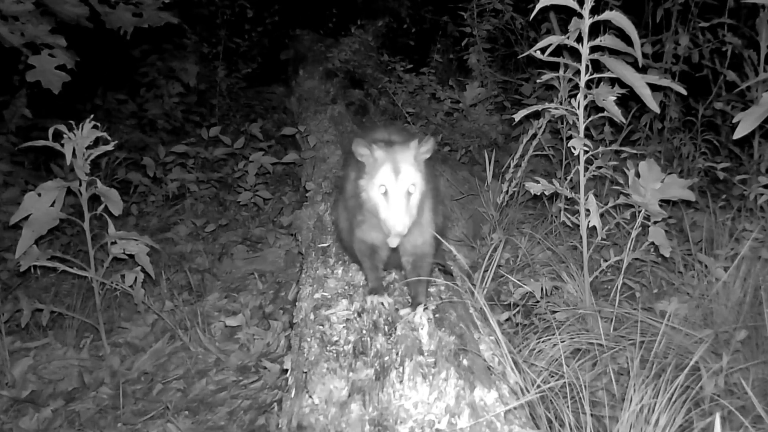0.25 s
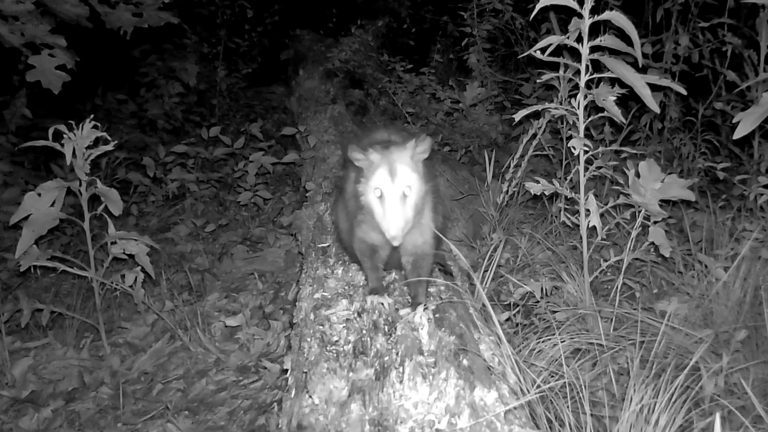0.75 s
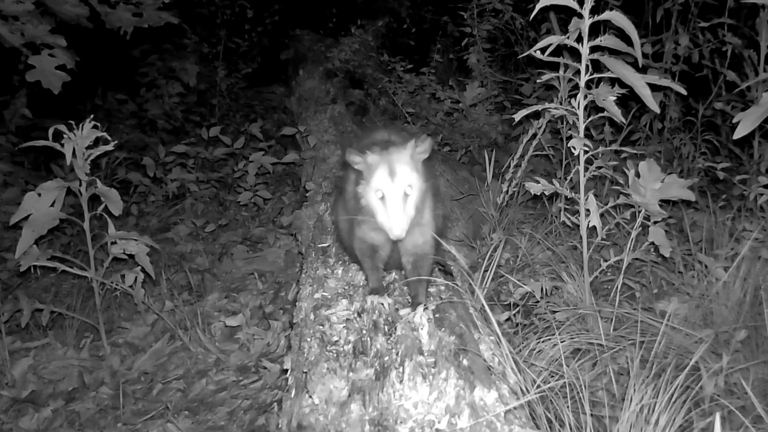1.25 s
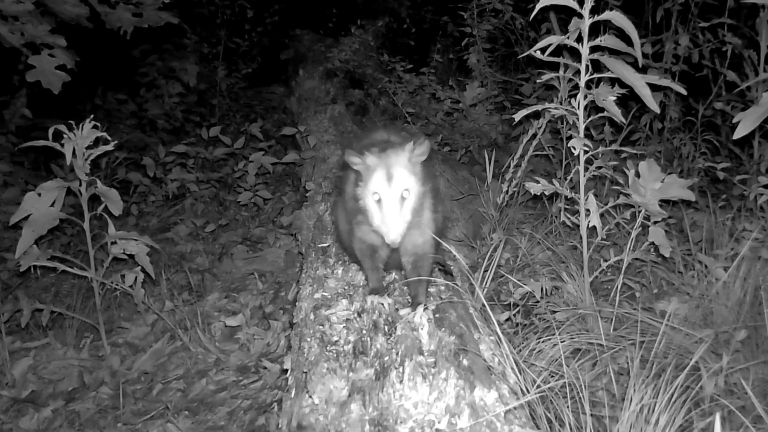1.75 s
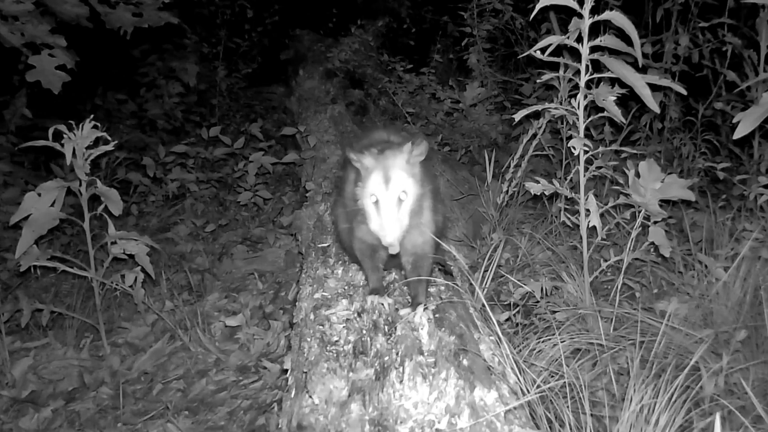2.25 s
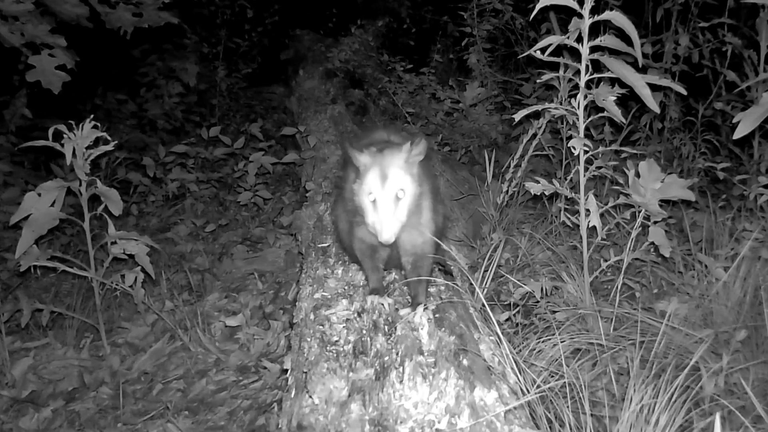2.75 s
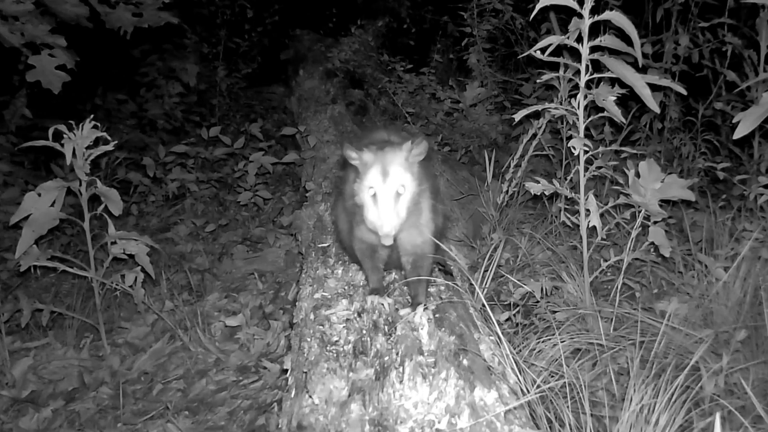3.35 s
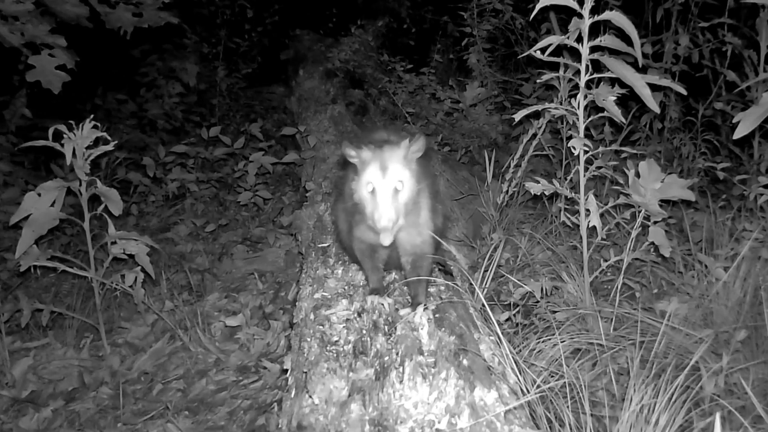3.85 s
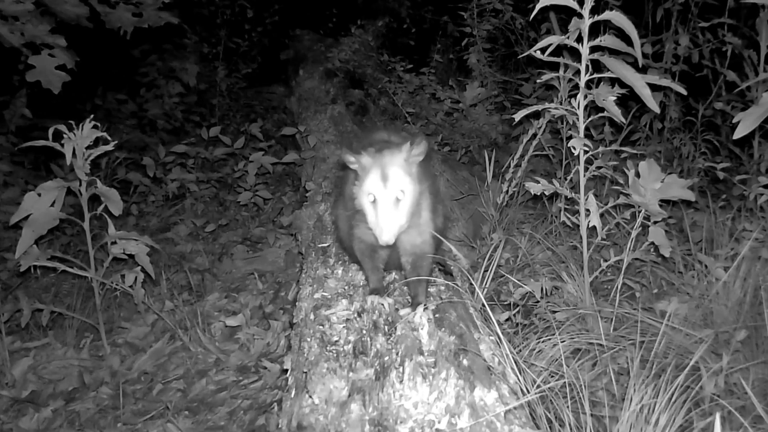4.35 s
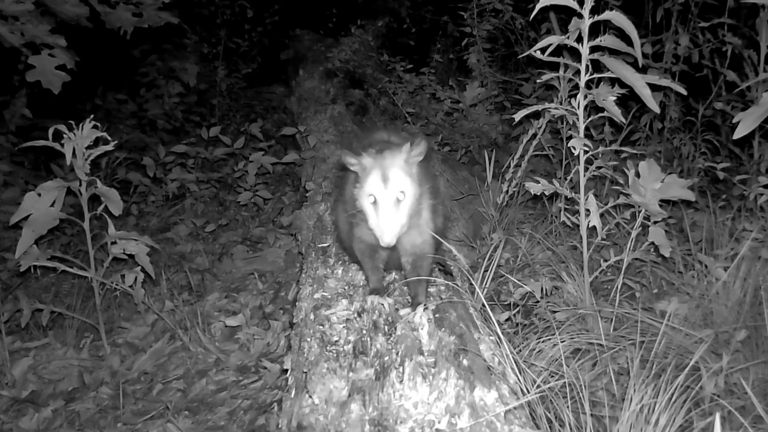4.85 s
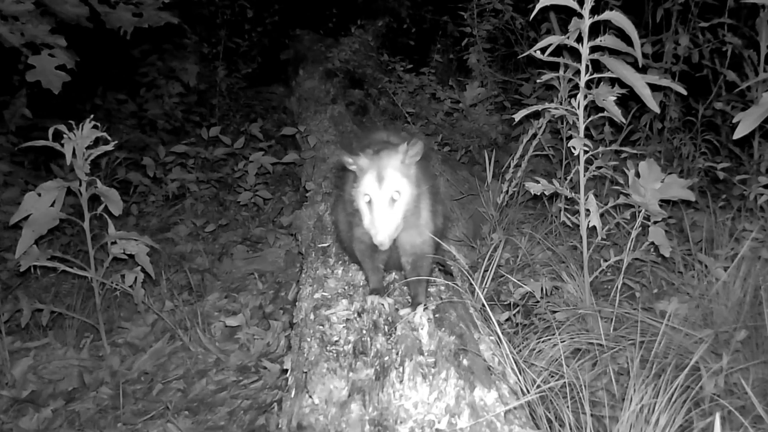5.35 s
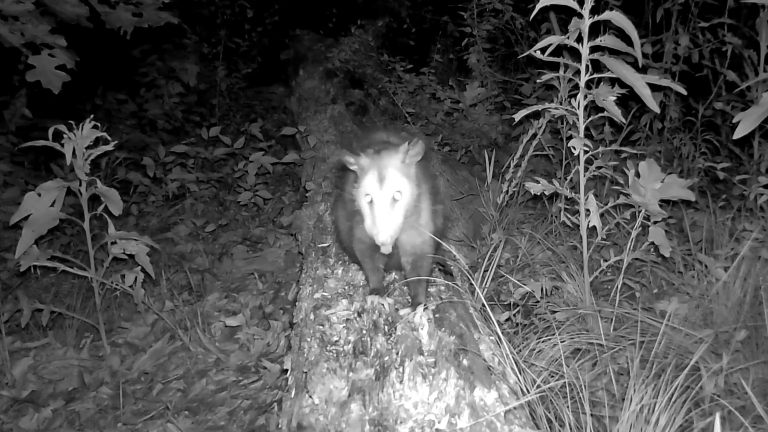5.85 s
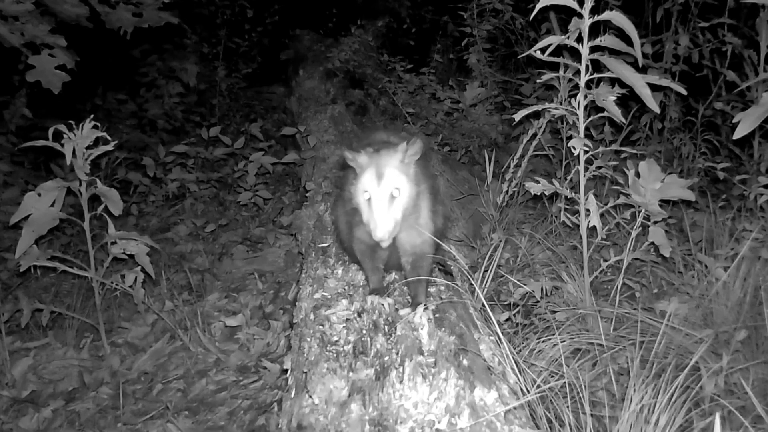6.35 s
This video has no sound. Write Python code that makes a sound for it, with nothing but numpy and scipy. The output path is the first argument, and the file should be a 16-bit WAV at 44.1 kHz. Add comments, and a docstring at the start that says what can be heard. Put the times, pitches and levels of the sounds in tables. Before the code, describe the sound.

A night scene at the edge of a wood, about six and a half seconds, heard by a small fixed outdoor microphone with dulled treble. Throughout, far motors drone low and slowly beat beneath soft air, a shimmering insect chorus, distant crickets and fine leaf ticks. Two near crickets chirp constantly, one about three swelling chirps a second, the other about four quick double strokes. From 0.1 s an opossum smacks its jaws wetly and crunches food; the firmest smacks come before 1 s, with crisp bites roughly every 0.4 s afterwards. At 2.2 s a soft low rush darkens and dies away, and brief low hum swells come and go until 5.6 s. At 4.0 s a tree frog gives one blurred trill of about half a second; at 4.2 s a hard morsel snaps brightly. Lighter smacks continue to about 6.2 s, with a last small crunch near 6.55 s.

```python
"""Night at the edge of a wood, heard by a trail camera. Throughout: far motors as steady sines that beat,
noise-band air and insect chorus, far crickets and leaf ticks. From the start an opossum smacks its jaws
(damped modes) and crunches its food (impulse clusters), and two near crickets chirp (swept wing strokes).
A low rush of noise dies away from 2.2 s; brief swells of low hum (sines, 58 to 120 Hz) come between 2.2 and
5.6 s; a tree frog trills once at 4 s (pulsed throat modes), and one hard morsel snaps at 4.2 s."""
import sys
import numpy as np
from scipy import signal
from scipy.fft import rfft, irfft
from scipy.io import wavfile
from scipy.ndimage import uniform_filter1d

SR = 44100
rng = np.random.default_rng(int(sys.argv[2]) if len(sys.argv) > 2 else 0)


def output_pcm(signal):
    """Save a mono or channel-first signal as 16-bit PCM at the path in sys.argv[1].

    Samples are clipped to [-1, 1] before scaling.
    """
    pcm = np.clip(np.atleast_2d(signal).T, -1, 1) * 32767
    wavfile.write(sys.argv[1], SR, np.round(pcm).astype(np.int16))


N = 290619
TIME = np.arange(N) / SR

# bites into the food: middle t/s, half length/s, crisp cracks level/dB, crack f/Hz, soft munch level/dB
BITE_TABLE = [(0.143, .0017, -35, 5140, -62), (0.19, .006, -52, 5950, -61),
              (0.611, 0.0082, -45.5, 7560, -45.5), (0.982, .008, -50.5, 6300, -56),
              (1.351, 0.0057, -51, 7700, -55), (1.823, 0.0055, -39.5, 7350, -64),
              (2.217, 0.01, -46.5, 6820, -56.5), (2.608, .01, -46, 7250, -53.5),
              (2.986, 0.0022, -47, 5060, -71), (3.365, .0023, -46, 6800, -66),
              (3.765, 0.011, -63.5, 7000, -56), (4.167, 0.01, -44.5, 6760, -65),
              (4.428, 0.006, -41.5, 3150, -63), (4.569, 0.0054, -48.5, 5500, -62),
              (4.908, 0.0086, -61, 6800, -52.5), (5.102, 0.024, -56, 7550, -53),
              (6.552, 0.0031, -53.5, 7100, -68)]


def undb(db):
    """Decibels to gain."""
    return 10 ** (np.asarray(db) / 20)


def level(x, db):
    """Scale to an rms level."""
    return x * undb(db) / np.sqrt(np.mean(x ** 2))


def add(out, start_s, x):
    """Mix a short sound in at start_s, cut at the end of out."""
    i = max(int(start_s * SR), 0)
    part = x[:max(N - i, 0)]
    out[i:i + len(part)] += part


def span(seconds):
    """Time axis of a short sound."""
    return np.arange(int(seconds * SR)) / SR


def walk(rate_hz):
    """Random values held 1 / rate_hz, smoothed twice, scaled to rms 1."""
    hold = int(SR / rate_hz)
    held = np.repeat(rng.standard_normal(N // hold + 1), hold)
    smooth = uniform_filter1d(uniform_filter1d(held, hold), hold)
    return level(smooth[:N], 0)


def noise(points):
    """Gaussian noise shaped by (Hz, dB) points, interpolated over log frequency."""
    hz, db = np.transpose(points)
    f = np.maximum(np.fft.rfftfreq(N, 1 / SR), 1)
    gain = undb(np.interp(np.log(f), np.log(hz), db))
    return irfft(rfft(rng.standard_normal(N)) * gain, N)


def resonate(x, hz, width_hz):
    """One resonance, gain 1 at its centre."""
    b, a = signal.iirpeak(hz, hz / width_hz, fs=SR)
    return signal.lfilter(b, a, x)


def ring(t, hz, t60_s, rise_s):
    """A damped mode with a quick swell, envelope peak 1."""
    envelope = (1 - np.exp(-t / rise_s)) * np.exp(-np.log(1000) * t / t60_s)
    return envelope / envelope.max() * np.sin(2 * np.pi * hz * t)


def scatter(x, t60_s, wet_db):
    """Diffuse echo: a decaying noise tail of unit energy, set by wet_db."""
    t = span(1)
    envelope = np.exp(-np.log(1000) * t / t60_s) * (1 - np.exp(-t / 0.0044))
    tail = rng.standard_normal(len(t)) * envelope
    tail /= np.sqrt(np.sum(tail ** 2))
    return undb(wet_db) * signal.fftconvolve(x, tail)[:N]


def motors(slow_shaft_hz=56.24, fast_shaft_hz=59.26, in_step_s=5.559):
    """Multiples of two far shaft speeds and lone tones, all in step at in_step_s; close ones beat."""
    # shaft multiples 1, 2, 3 ..: level/dB rms
    slow_shaft_db = [-68, -57, -58, -54, -72, -66, -70.5]
    fast_shaft_db = [-59, -54, -80, -67.5]
    # lone steady tones: f/Hz; level/dB rms
    lone_hz = [109.76, 120.01, 210.9, 240.02, 535.5]
    lone_db = [-70, -55.5, -72.5, -76, -71.5]
    tones = list(zip(lone_hz, lone_db))
    for shaft_hz, dbs in (slow_shaft_hz, slow_shaft_db), (fast_shaft_hz, fast_shaft_db):
        tones += [(shaft_hz * (k + 1), db) for k, db in enumerate(dbs)]
    from_step = TIME - in_step_s
    return sum(np.sqrt(2) * undb(db) * np.cos(2 * np.pi * hz * from_step) for hz, db in tones)


def background(air_db=-52.0, chorus_db=-55.5):
    """Low night air and a shimmering far insect chorus, both shaped noise."""
    # air spectrum: f/Hz, relative level/dB per Hz
    air_points = [(20, -12), (38, 2.5), (60, -0.5), (85, 0), (115, 1), (150, -5.5), (215, -1), (260, -8.5),
                  (400, -11.5), (700, -16), (1300, -17), (2000, -21.5), (3300, -24.5), (9000, -42.5)]
    # insect chorus spectrum: f/Hz, relative level/dB per Hz
    chorus_points = [(3000, -30.5), (3450, -16), (3750, -9.5), (4120, 2), (4500, -4.5), (4900, -2),
                     (5100, -15.5), (6000, -23), (6800, -19), (7600, -24), (9000, -28.5)]
    air = level(noise(air_points) * undb(0.47 * walk(2.6)), air_db)
    shimmer_db = 1.3 * walk(60) + 1.0 * walk(5.3)
    return air + level(noise(chorus_points) * undb(shimmer_db), chorus_db)


def wing_stroke(t, length_s=0.01947, start_hz=4200, drop_hz=600, lateness=2.09):
    """The scraper gathers force along the file, then slows: the tone swells late and sinks in pitch."""
    u = np.clip(t / length_s, 0, 1)
    # integral of start_hz - drop_hz * u ** 3
    cycles = length_s * (start_hz * u - drop_hz * u ** 4 / 4)
    force = np.abs(np.sin(np.pi * u ** lateness))
    return force * np.sin(2 * np.pi * cycles)


def far_crickets(strokes_per_s=26, db=-59):
    """Crickets deeper in the wood: random wing strokes smeared by the trees."""
    out, t = np.zeros(N), span(.03)
    for when, pitch, size in rng.random((int(strokes_per_s * N / SR), 3)):
        add(out, when * N / SR, size * wing_stroke(t * (1 + .035 * pitch)))
    return level(out + scatter(out, t60_s=0.13, wet_db=-6.5), db)


def leaf_ticks(db=-70, centre_hz=6100, spread=0.23, ticks_per_s=130):
    """Fine dense crackle in the leaf litter: short modes of random pitch, most of them small."""
    out, t = np.zeros(N), span(.02)
    for when, pitch, size in rng.random((int(ticks_per_s * N / SR), 3)):
        hz = centre_hz * (1 + spread * (2 * pitch - 1))
        tick = ring(t, hz, t60_s=.002, rise_s=.0003) / (.02 + size) ** .45
        add(out, when * N / SR, tick)
    return level(out + scatter(out, t60_s=.015, wet_db=2), db)


def chewing():
    """The opossum's jaws, echoed by the log and the plants around it."""
    out = smacks() + crunches() + snap() + crumbs()
    log_echo = scatter(out, t60_s=0.03, wet_db=-13)
    plant_echo = scatter(out, t60_s=0.14, wet_db=-15.5)
    return out + log_echo + plant_echo


def crumbs(max_db=-44, range_db=9, centre_hz=6700, spread=0.19, count=14):
    """Stray crumbs crack at random times, each a short high mode."""
    out, t = np.zeros(N), span(.02)
    for when, pitch, size in rng.random((count, 3)):
        hz = centre_hz * (1 + spread * (2 * pitch - 1))
        crack = ring(t, hz, t60_s=0.0095, rise_s=0.00064)
        add(out, when * N / SR, undb(max_db - range_db * size) * crack)
    return out


def smacks(body_db=-4, crackle_db=-10.5, usual_db=-40, usual_t60_s=0.023, halving_db=14):
    """Tooth tick, mouth ring and wet crackle; a firmer smack shuts the mouth sooner, so rings shorter."""
    # jaw smacks: t/s, mouth ring level/dB, mouth f/Hz, tooth tick level/dB, tick f/Hz
    smack_table = [(0.1422, -19.5, 1590, -28.5, 3000), (.1622, -36, 1420, -48, 3020),
                   (0.1885, -27.5, 1110, -25.5, 2450), (0.2006, -38, 950, -47, 2600),
                   (0.617, -27.5, 1276, -22.5, 3840), (0.6628, -27, 1040, -14, 3080),
                   (.826, -39, 1070, -61, 2500), (0.9784, -30.5, 1555, -24, 3600),
                   (1.259, -43, 930, -61, 2500), (1.823, -52, 1616, -31.5, 5040),
                   (1.96, -54, 1500, -33.5, 3460), (2.226, -41.5, 1390, -45, 3150),
                   (2.6074, -35.5, 1650, -55, 3520), (2.782, -38.5, 1265, -60, 2800),
                   (3.132, -42.5, 1283, -48, 2840), (3.492, -49.5, 3080, -43, 3080),
                   (4.428, -41.5, 1570, -44, 3340), (4.558, -47.5, 2250, -38, 2530),
                   (4.906, -38.5, 2140, -34.5, 3200), (4.9617, -38, 1490, -58, 3050),
                   (5.085, -45, 1700, -47, 2580), (5.125, -40, 1315, -49, 3000),
                   (5.396, -47.5, 1580, -57, 3000), (5.549, -46, 1220, -60, 3000),
                   (5.947, -43, 1280, -52, 2600), (6.161, -44, 3080, -41, 2300)]
    out, t = np.zeros(N), span(.06)
    for start_s, mouth_db, mouth_hz, tick_db, tick_hz in smack_table:
        t60_s = usual_t60_s * 2 ** ((usual_db - mouth_db) / halving_db)
        mouth = ring(t, mouth_hz, t60_s, rise_s=0.00036)
        mouth += undb(body_db) * ring(t, 2.02 * mouth_hz, t60_s=0.0017, rise_s=0.000086)
        drops = rng.standard_normal(len(t)) * (rng.random(len(t)) < .03) * np.exp(-t / 0.013)
        crackle = resonate(drops, 0.72 * mouth_hz, width_hz=1300)
        crackle *= undb(crackle_db) / np.abs(crackle).max()
        tick = ring(t, tick_hz, t60_s=0.003, rise_s=0.00022)
        add(out, start_s, undb(mouth_db) * (mouth + crackle) + undb(tick_db) * tick)
    return out


def crunches():
    """At each bite the food crumbles: a cluster of tiny cracks, crisp with a hollow undertone."""
    out, t = np.zeros(N), span(.1) - .1 / 2
    for middle_s, half_s, db, hz, _ in BITE_TABLE:
        cracks = rng.standard_normal(len(t)) * (rng.random(len(t)) < .08)
        window = np.exp(-np.abs(t) / half_s)
        crisp = resonate(resonate(cracks, hz, width_hz=940), hz, width_hz=1200)
        hollow = undb(-13.5) * resonate(cracks, hz=1660, width_hz=1300)
        cluster = level((crisp + hollow) * window, db)
        # restore the energy share of the window: longer bites carry more
        add(out, middle_s + t[0], cluster * np.sqrt(np.mean(window ** 2)))
    return out


def munching(grains_per_s=900, stretch=1.5):
    """At each bite soft food gives way in a scatter of dull grains, longer than the cracks by stretch."""
    drops = (rng.random(N) < grains_per_s / SR) * rng.standard_normal(N)
    mouth = resonate(drops, hz=1550, width_hz=700)
    mouth += undb(-6.5) * resonate(drops, hz=2700, width_hz=4700)
    pressure = np.zeros(N)
    for middle_s, half_s, _, _, db in BITE_TABLE:
        pressure += undb(db) * np.exp(-((TIME - middle_s) / (stretch * half_s)) ** 2)
    return level(resonate(mouth, hz=1900, width_hz=4900), 0) * pressure


def crickets(lead_s=.0125, echo_db=-6.0, echo_s=.0052, detune=.012, uneven_db=0.57):
    """Two crickets' wing strokes; close reflections beat with each sweep and break it into lobes."""
    # slower cricket, about three swelling chirps a second: last stroke t/s, its nominal peak level/dB
    swelling_chirps = [(0.284, -29.5), (.532, -27.5), (.865, -31), (1.189, -30.5), (1.433, -30),
                       (1.736, -30.5), (2.093, -31), (2.441, -31.5), (2.787, -30.5), (3.108, -30.5),
                       (3.328, -31.5), (3.683, -31.5), (4.015, -33.5), (4.338, -32.5), (4.69, -37),
                       (4.942, -33.5), (5.215, -31), (5.592, -30.5), (5.878, -30), (6.182, -31.5),
                       (6.535, -31.5)]
    swell_gap_s, swell_db_per_stroke = .025, 4.5
    # quicker cricket, about four double strokes a second: first stroke t/s, its nominal peak level/dB
    double_chirps = [(.303, -34), (0.532, -32), (.748, -30), (1.139, -33), (1.355, -37.5), (1.665, -33),
                     (1.977, -38.5), (2.24, -37), (2.487, -34.5), (2.712, -36), (2.943, -37), (3.16, -37.5),
                     (3.406, -37.5), (3.658, -29.5), (3.9, -42), (4.134, -35.5), (4.36, -37),
                     (4.599, -39.5), (4.862, -40.5), (5.092, -38), (5.314, -36.5), (5.567, -35),
                     (5.827, -29), (6.048, -38.5), (6.322, -37), (6.58, -36)]
    double_gap_s, double_fade_db = .0275, 2.5

    strokes = []
    for last_s, db in swelling_chirps:
        strokes += [(last_s - k * swell_gap_s, db - k * swell_db_per_stroke) for k in range(4)]
    for first_s, db in double_chirps:
        strokes += [(first_s + k * double_gap_s, db - k * double_fade_db) for k in range(2)]

    out, t = np.zeros(N), span(0.03)
    for stroke_s, db in strokes:
        own_t = t * (1 + detune * rng.standard_normal())
        lags_s = 0.0012 + echo_s * rng.random(size=2)
        reflections = sum(wing_stroke(own_t - lag_s) for lag_s in lags_s)
        stroke = wing_stroke(own_t) + undb(echo_db) * reflections
        gain = undb(db + uneven_db * rng.standard_normal())
        add(out, stroke_s - lead_s, gain * stroke / np.abs(stroke).max())
    # the scraper grips the file unevenly, which roughens each stroke
    out = out * undb(2.5 * walk(450))
    return out + scatter(out, t60_s=0.18, wet_db=-7.5)


def low_rush(start_s=2.21, db=-49.5):
    """A soft, uneven low rush: the brighter noise dies first, so it darkens."""
    age_s = np.maximum(TIME - start_s, 0)
    bright = level(noise([(400, -17), (760, -2), (1200, -13.0), (3000, -51)]), db)
    bright *= np.exp(-age_s / .1) * (1 - np.exp(-age_s / 0.025))
    dark = level(noise([(250, -22.0), (480, 3.5), (650, -6.5), (1200, -29.0), (3000, -44)]), db)
    dark *= np.exp(-age_s / 0.28) * (1 - np.exp(-age_s / 0.1))
    return (bright + dark) * undb(1.1 * walk(50))


def hum_swells(half_s=0.02):
    """Brief swells of low hum at 58 to 120 Hz, each a sine under a Gaussian envelope."""
    # brief hum swells: middle t/s, peak level/dB, f/Hz
    swell_table = [(2.251, -42, 62), (2.349, -41.5, 80), (2.93, -44, 62), (3.018, -40, 62),
                   (3.409, -39, 120), (3.602, -39, 113), (4.066, -37, 119), (4.369, -42, 117),
                   (4.881, -36, 106), (5.27, -43, 58), (5.416, -40, 116), (5.559, -39, 116)]
    out = np.zeros(N)
    for middle_s, db, hz in swell_table:
        t = TIME - middle_s
        out += undb(db) * np.exp(-(t / half_s) ** 2) * np.cos(2 * np.pi * hz * t)
    return out


def frog(low_ratio=0.568, low_db=-11, low_lead_s=0.012, sac_db=1, jitter_s=0.000705, count=15):
    """A swelling, slowing trill scooping up; each pulse opens on a weak low mode, then rings the throat."""
    start_s, pulse_hz, slowing_per_pulse = 4.002, 34.2, .0028
    pulse_db, swell_db_per_s, attack_s, release_s = -39.5, 4, 0.028, .02  # pulse_db: ahead of the sac
    throat_hz, scoop_hz, settle_s = 2570, 120, 0.08

    out, t = np.zeros(N), span(.04)
    pulses = np.arange(count)
    ages_s = pulses / pulse_hz * (1 + slowing_per_pulse * pulses)
    for age_s in ages_s + jitter_s * rng.standard_normal(count):
        hz = throat_hz - scoop_hz * np.exp(-age_s / settle_s)
        hz *= 1 + .008 * rng.standard_normal()
        low_hz = low_ratio * hz * (1 + .04 * rng.standard_normal())
        effort = 1 - 0.74 * np.exp(-age_s / attack_s)
        effort *= 1 - 0.24 * np.exp((age_s - ages_s[-1]) / release_s)
        size = effort * undb(pulse_db + swell_db_per_s * age_s + rng.standard_normal())
        low = undb(low_db) * ring(t, low_hz, t60_s=0.014, rise_s=.003)
        add(out, start_s + age_s - low_lead_s, size * low)
        add(out, start_s + age_s, size * ring(t, hz, t60_s=0.0095, rise_s=0.0051))
    # the vocal sac passes two bands with a dark valley between them
    sac = np.zeros(N)
    for band_hz in [1150, 1900], [2350, 2900]:
        sac += signal.sosfilt(signal.butter(3, band_hz, "band", fs=SR, output="sos"), out)
    # the trees blur the trill
    return undb(sac_db) * (sac + scatter(sac, t60_s=.3, wet_db=.5))


def snap(start_s=4.1901, low_cut_hz=2700):
    """One hard morsel breaks with a bright crack; the mouth rings faintly after it."""
    # modes, mouth first, then the morsel ahead of its low cut: f/Hz, peak level/dB, t60/s
    mode_table = [(1130, -42, .045), (4200, -26.5, .008), (4180, -8.5, 0.0023), (6670, -27.5, 0.0048)]
    out, t = np.zeros(N), span(.06)
    mouth, *morsel = [undb(db) * ring(t, hz, t60_s, rise_s=0.00019) for hz, db, t60_s in mode_table]
    low_cut = signal.butter(2, low_cut_hz, "high", fs=SR, output="sos")
    add(out, start_s, mouth + signal.sosfilt(low_cut, sum(morsel)))
    return out


def scene():
    """All sources at one microphone."""
    wildlife = crickets() + far_crickets() + frog() + chewing() + munching() + leaf_ticks()
    return (wildlife + motors() + hum_swells() + background() + low_rush())[None]


def record(dry, top_hz=8300):
    """The camera dulls the top, then cuts it steeply: two low-passes at top_hz."""
    dulled = signal.sosfilt(signal.butter(8, top_hz, fs=SR, output="sos"), dry)
    return signal.sosfilt(signal.cheby1(12, .2, top_hz, fs=SR, output="sos"), dulled)


dry = scene()
out = record(dry)
output_pcm(out)
```